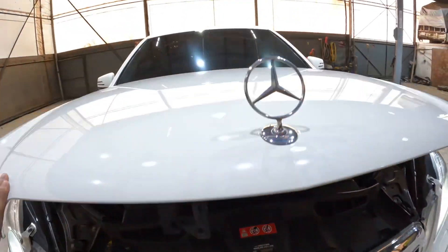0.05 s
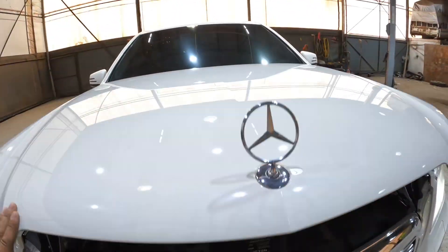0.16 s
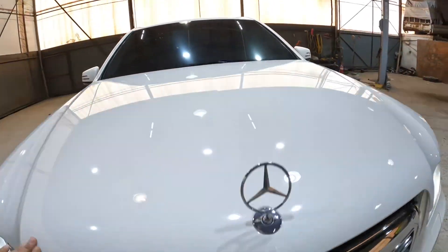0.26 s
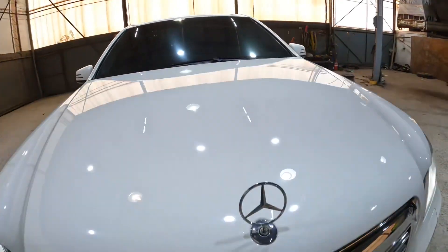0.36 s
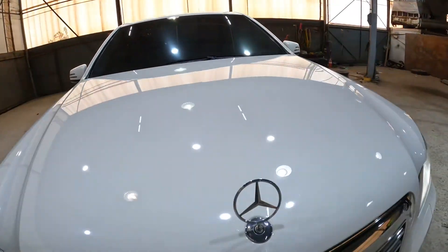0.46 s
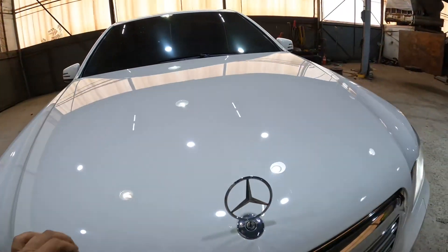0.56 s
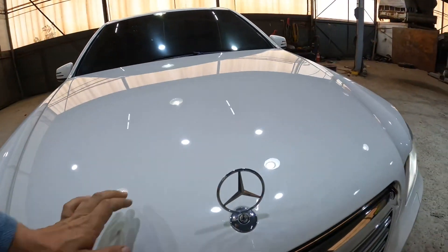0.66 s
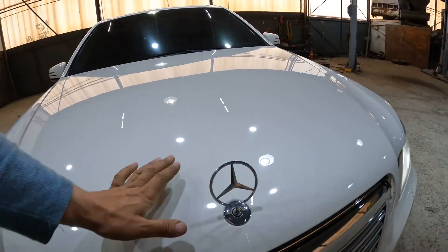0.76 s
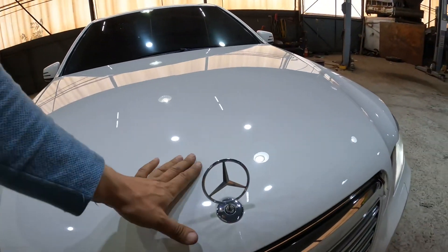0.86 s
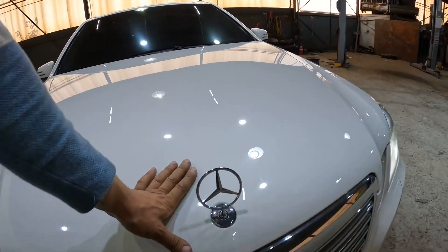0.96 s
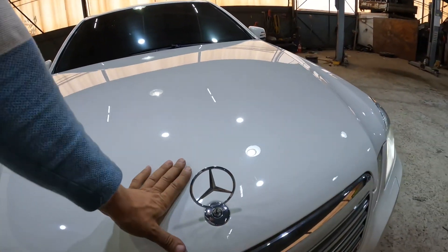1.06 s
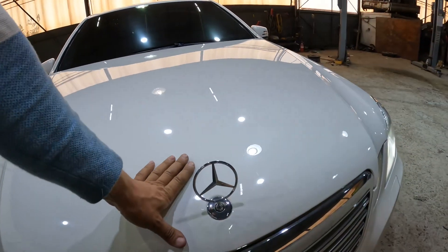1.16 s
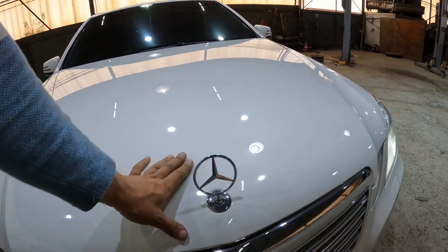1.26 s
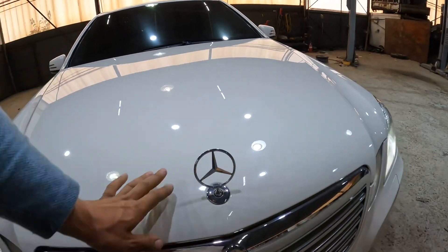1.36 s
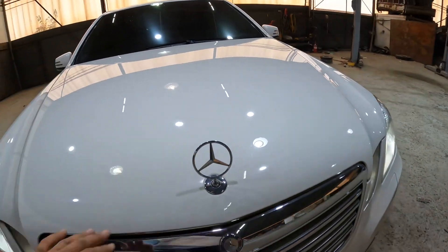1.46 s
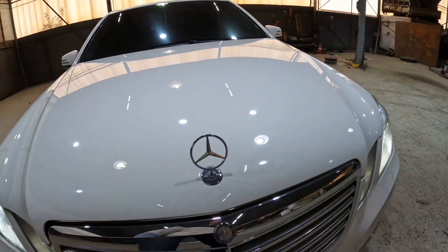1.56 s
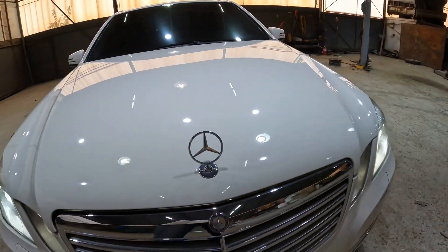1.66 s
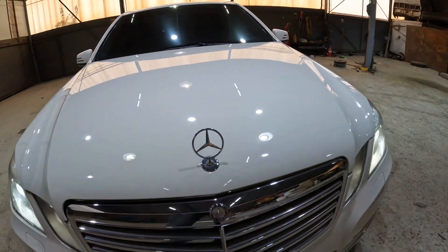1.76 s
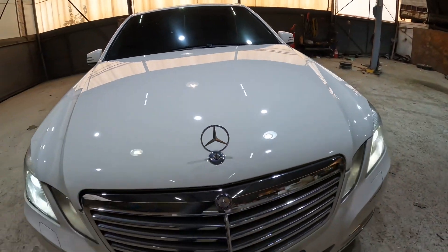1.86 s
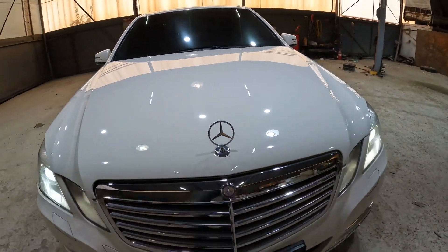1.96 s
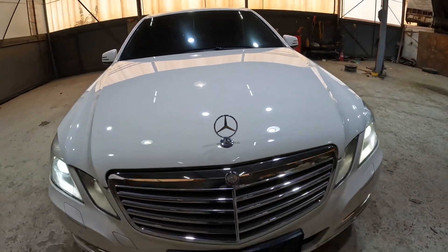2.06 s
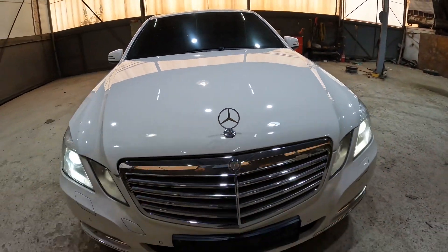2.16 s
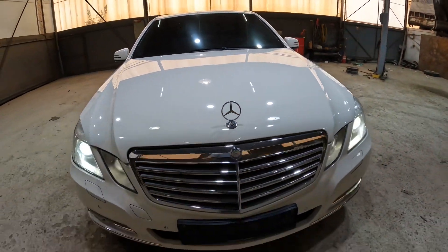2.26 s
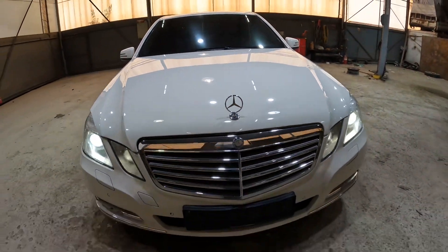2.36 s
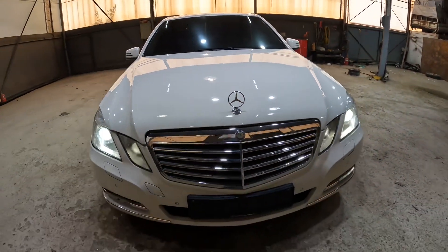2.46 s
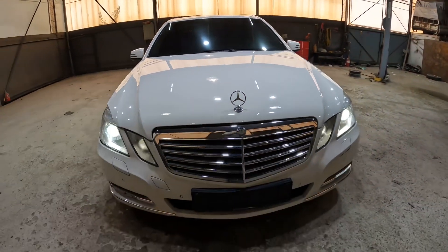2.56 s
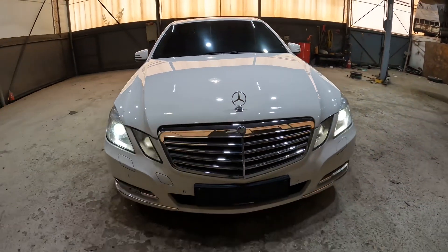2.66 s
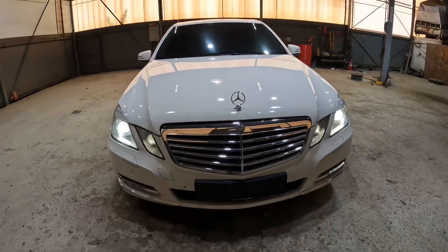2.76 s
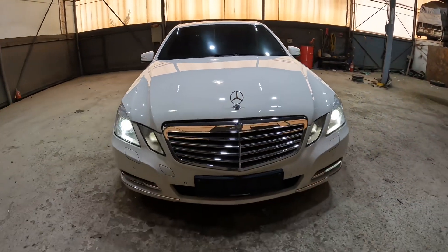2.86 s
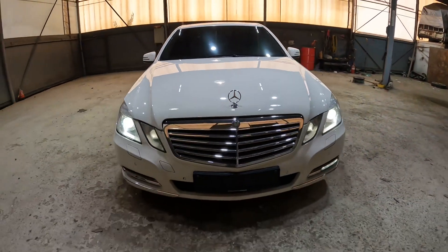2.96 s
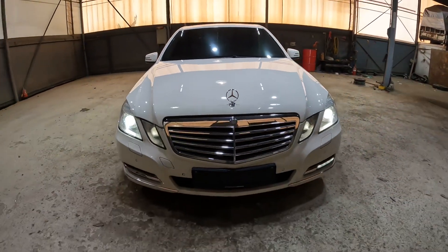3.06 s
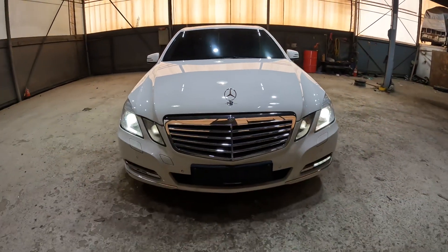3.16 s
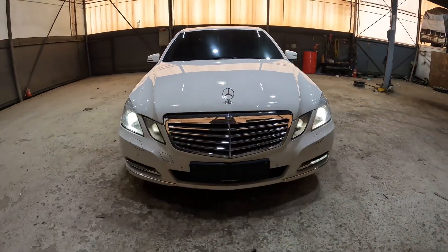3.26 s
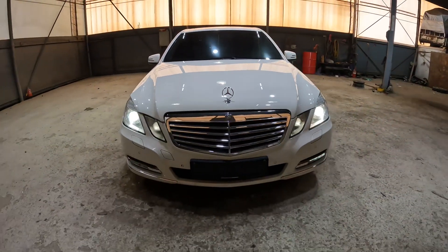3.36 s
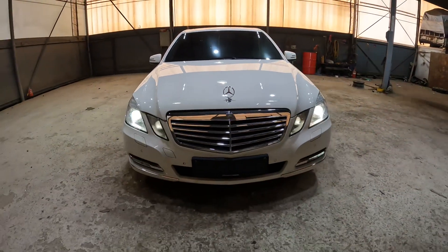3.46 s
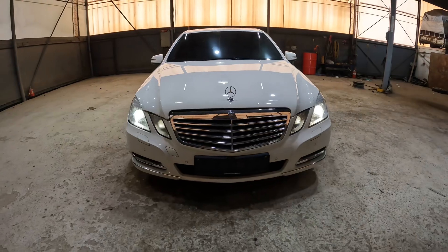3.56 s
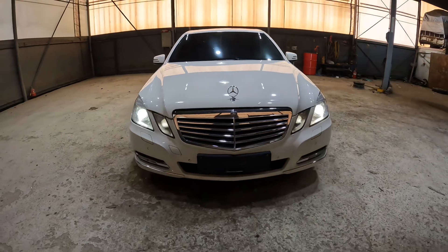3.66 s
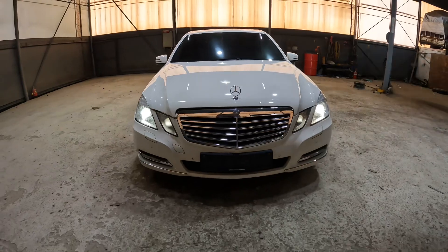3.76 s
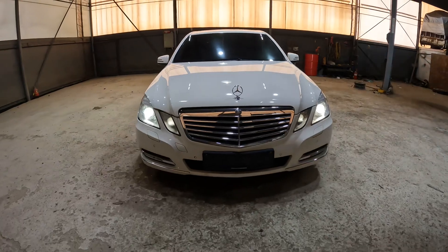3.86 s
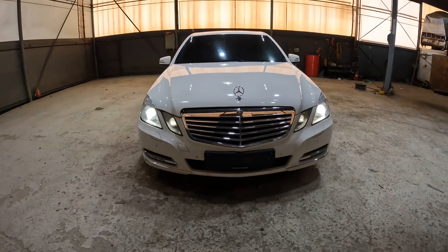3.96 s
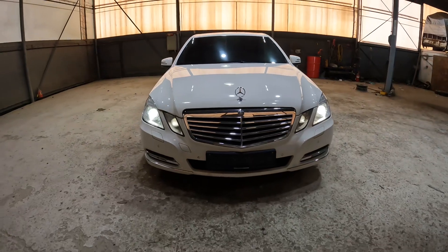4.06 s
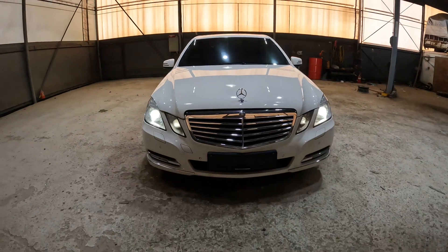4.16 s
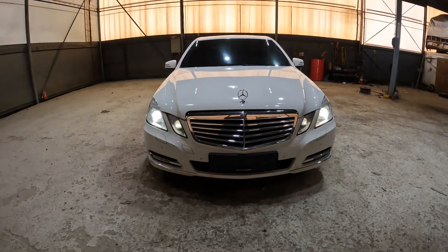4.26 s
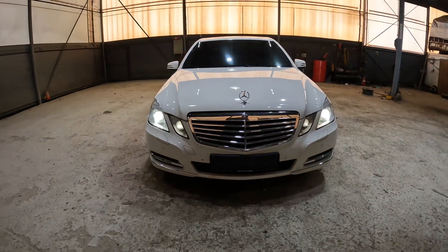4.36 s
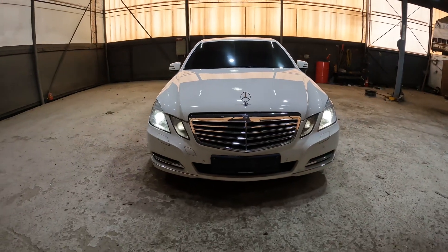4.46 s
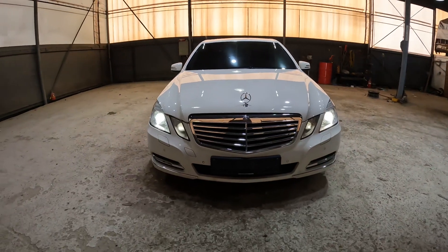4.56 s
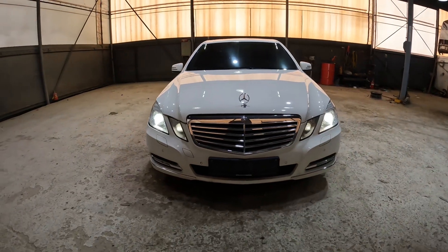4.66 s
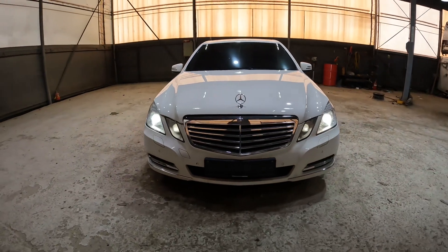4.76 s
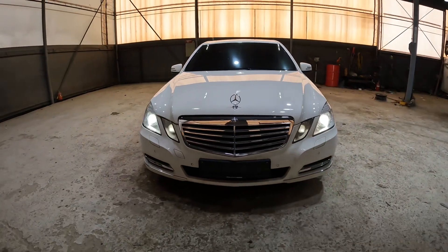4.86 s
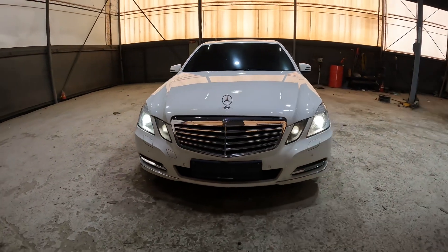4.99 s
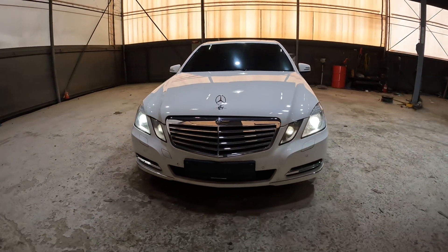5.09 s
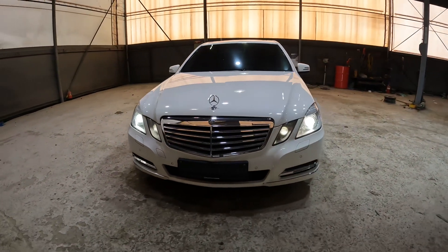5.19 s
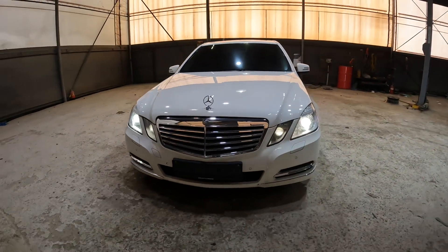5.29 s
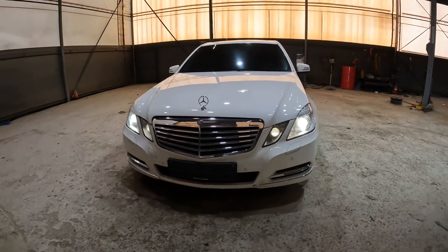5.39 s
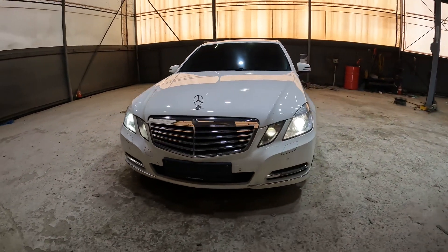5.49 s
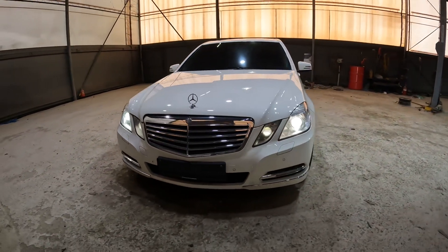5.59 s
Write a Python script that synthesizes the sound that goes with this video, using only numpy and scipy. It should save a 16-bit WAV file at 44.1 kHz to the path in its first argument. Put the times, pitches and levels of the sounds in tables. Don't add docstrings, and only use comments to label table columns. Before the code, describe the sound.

A car hood bangs down, bounces and is pressed shut over a steadily idling engine in a large echoing shed, then soles squeak and scuff.

```python
import sys
import numpy as np
from scipy import signal
from scipy.fft import rfft, irfft, next_fast_len
from scipy.io import wavfile

SR = 44100
rng = np.random.default_rng(int(sys.argv[2]) if len(sys.argv) > 2 else 0)


def field_ratio(decibels):
    return 10 ** (np.asarray(decibels, dtype=float) / 20)


def file_out(sig):
    cols = np.atleast_2d(sig).T
    lim = np.clip(cols, -1, 1)
    pcm = np.round(lim * 32767).astype(np.int16)
    wavfile.write(sys.argv[1], SR, pcm)


N = 248283


def rms_one(x):
    return x / np.sqrt(np.mean(x ** 2) + 1e-20)


def in_time(rows, outside=None):
    s, *columns = np.transpose(rows)
    return [np.interp(np.arange(N) / SR, s, c, outside, outside) for c in columns]


def at_hz(points, hz):
    curve_hz, curve_db = np.transpose(points)
    return np.interp(np.log(hz), np.log(curve_hz), curve_db)


def drift(rate):
    r = np.exp(-80 * np.pi * rate / SR)
    slow = signal.lfilter([1], [1, -2 * r, r * r], rng.standard_normal(N // 40 + 2002))[2000:]
    return np.interp(np.arange(N) / 40, np.arange(len(slow)), rms_one(slow))


def bumps(rows, half_s):
    t = np.arange(N) / SR
    return sum(db * np.maximum(1 - np.abs(t - s) / half_s, 0) for s, db in rows)


def held(times_s, db):
    return field_ratio(db + np.interp(np.arange(N) / SR, times_s, [-20, 0, 0, -20], -90, -90))


def dying(start_s, t60, rise_s, at=slice(0, N)):
    t = np.maximum(np.arange(at.start, at.stop) / SR - start_s, 0)
    return (1 - np.exp(-t / rise_s)) * np.exp(-np.log(1000) * t / t60)


def while_ringing(start_s, t60):
    return slice(int(start_s * SR), min(int((start_s + 1.5 * t60) * SR), N))


def ring(clicks, hz, t60):
    r, w = field_ratio(-60 / (t60 * SR)), 2 * np.pi * hz / SR
    return signal.lfilter([0, np.sin(w)], [1, -2 * r * np.cos(w), r * r], clicks + 1e-18)


def rough_tone(hz, start_s, jitter, at):
    t = np.arange(at.start, at.stop) / SR - start_s
    return np.sin(2 * np.pi * hz * t + jitter)


def band(x, low_hz, high_hz, order=2):
    sos = signal.butter(order, [low_hz, high_hz], "band", fs=SR, output="sos")
    return rms_one(signal.sosfilt(sos, x))


def spread(db):
    return field_ratio(np.array([[db / 2], [-db / 2]]))


def coloured(spectrum, unlike_share=1):
    # (frequency [Hz], likeness [0-1])
    likeness = [(30, 0.93), (100, 1), (200, 0.99), (380, 0.91), (690, 0.87), (1280, 0.84), (2360, 0.57),
                (3500, 1), (5000, 0.56), (8500, 1), (14800, 0.42)]
    size = next_fast_len(N)
    hz = np.maximum(np.fft.rfftfreq(size, 1 / SR), 1)
    mid, side = rfft(rng.standard_normal((2, size)))
    alike = np.clip(1 - unlike_share * (1 - at_hz(likeness, hz)), 0, 1)
    pair = np.sqrt(1 + alike) * mid + np.sqrt(1 - alike) * side * [[1], [-1]]
    return rms_one(irfft(pair * field_ratio(at_hz(spectrum, hz)), size)[:, :N])


def engine():
    # (time [s], level [dB])
    idle = [(0, -34.5), (.19, -36.5), (.41, -37.5), (.83, -47), (1.03, -44), (1.39, -48), (1.65, -45.5),
            (2.24, -41), (2.63, -38), (2.85, -37), (3.73, -36), (3.87, -37.5), (5.63, -37)]
    # (frequency [Hz], level [dB per Hz])
    rumble_colour = [(8.8, -30), (15, 2), (43, -8), (63, -8), (90, -18.5), (120, -19), (200, -120)]
    exhaust_colour = [(50, -25), (85, 1.5), (139, -2.5), (215, -5), (252, -7.5), (311, -10.5), (370, -11),
                      (450, -9.5), (580, -20), (990, -120)]
    roar_colour = [(250, -55), (430, -7), (518, 0), (814, -5), (934, 0.5), (1270, -1.5), (1770, -4.5),
                   (2130, -6.5), (2450, -10), (2750, -8), (3160, -12), (4500, -14), (5850, -24.5),
                   (9900, -120)]
    hiss_colour = [(2350, 0.5), (4000, -4.5), (4580, -5.5), (5570, -3), (7450, -3.5), (8000, -9.5),
                   (8520, -15), (10600, -11), (11400, -18.5), (12200, -17), (13200, -29.5), (14500, -13),
                   (15200, -57)]
    # (multiple of firing rate [1], level over the exhaust [dB])
    firing_orders = [(1, 0.5), (1.5, -0.5), (3, -3), (4, -14.5), (5, -8.5), (6, -11), (10, -17)]
    # (frequency [Hz], width [Hz], level over the roar [dB])
    whines = [(1016, 21, -21), (1135, 18, -18.5), (1444, 19, -13.5), (1765, 170, -14), (2020, 32, -20),
              (2670, 47, -36), (3910, 50, -24.5), (4500, 80, -23), (4840, 160, -20.5), (7470, 58, -27.5),
              (7700, 80, -30.5)]
    # (time [s], level [dB])
    body_shudders = [
        (.46, 1.4),
        (1.09, -4.5),
    ]
    # (time [s], depth [dB])
    lulls = [(0.0, 9), (.58, 12), (.85, 3), (1.2, 14), (3.5, 3.5), (4.12, 3), (4.78, 6), (5.6, -2)]
    # (time [s], change [dB])
    surges = [(.25, -1), (.93, -5), (1.45, -4), (3.0, 1), (4.13, 2), (4.4, 4.5), (4.75, -1)]
    # (level when settled [dB], share of the idle's swing [1], gain with hood up [dB], level
    # of the body's shudder [dB])
    rumble_law = (-28, 2.26, -4.5, -42)
    exhaust_law = (-38.5, 0.38, 6, -25.5)
    roar_law = (-36.5, 1.0, 0.7, -29.5)
    hiss_law = (-45.5, 1.05, 6.5, -42.5)
    belt_law = (-52.5, 1.3, 9, -49)
    firing_hz, settled_db = 36.59, -37
    hood_falls_s, hood_down_s = 0.11, 0.75
    belt_grips_s, belt_fade_db_per_s = 2.8, 70

    t = np.arange(N) / SR
    swing_db = in_time(idle)[0] - settled_db
    hood_up = np.interp(t, [hood_falls_s, hood_down_s], [1, 0])
    shudder = sum(field_ratio(db) * dying(s, t60=1.25, rise_s=0.025) for s, db in body_shudders)

    def gain(law):
        db, share, up_db, shudder_db = law
        return field_ratio(db + share * swing_db + up_db * hood_up) + field_ratio(shudder_db + 0.5 * swing_db) * shudder

    rumble = coloured(rumble_colour) * field_ratio(2.14 * drift(7.4) - bumps(lulls, half_s=0.164))

    turn = 2 * np.pi * np.cumsum(firing_hz * (1 + 0.00774 * drift(1.38))) / SR
    exhaust = coloured(exhaust_colour) * field_ratio(1.8 * drift(6))
    for k, db in firing_orders:
        waver = field_ratio(db + 4.3 * np.tanh(drift(7.8)))
        exhaust += waver * np.sin(k * turn + rng.uniform(0, 2 * np.pi))
    exhaust *= field_ratio(bumps(surges, half_s=0.15))

    surge_db = 0.85 * drift(9.1)
    roar = coloured(roar_colour) * field_ratio(surge_db + 0.4 * np.sin(turn) + 0.5 * drift(41))
    grille_db = 1.2 + 0.67 * swing_db
    for hz, width, db in whines:
        whine = rms_one(ring(rng.standard_normal(N), hz, t60=2.2 / width))
        roar += field_ratio(db + grille_db + 2.14 * drift(4.1)) * whine * spread(rng.normal(0, 3.1))
    hiss = coloured(hiss_colour) * field_ratio(surge_db + 1.24 * drift(41))

    slip = rng.standard_normal(N)
    whistle = ring(slip, 5130, t60=0.03) * field_ratio(4 * drift(11))
    whistle += ring(slip, 5300, t60=0.03) * field_ratio(4 * drift(11))
    chirp = rms_one(whistle) * field_ratio(-belt_fade_db_per_s * np.maximum(t - belt_grips_s, 0))

    out = gain(rumble_law) * rumble + gain(exhaust_law) * exhaust
    return out + gain(roar_law) * roar + gain(hiss_law) * hiss + gain(belt_law) * chirp


def catch():
    # (time [s], crack [dB], knock [dB], ring pitch [Hz], ring level [dB])
    contacts = [(0.3623, -4, -24, 3270, -8.5), (.365, -28, -27, 5380, -12), (0.378, -23, -11, 2040, -19),
                (0.388, -7, -22, 2040, -23), (0.393, -10, -13, 5180, -16), (0.404, -16, -21, 3670, -19),
                (0.412, -19, -13, 2830, -19), (0.417, -21, -26, 10000, -25), (0.424, -14, -25, 5300, -31),
                (.448, -15, -19.5, 4210, -21.5), (0.5078, -18.5, -11, 6100, -23),
                (.535, -42, -37, 3080, -28), (.566, -31, -17.5, 3100, -32), (0.599, -30, -36, 2470, -31),
                (0.929, -42, -34.5, 1520, -34), (1.048, -37, -27, 2050, -36),
                (1.056, -15.5, -35, 6400, -20), (1.059, -17, -28, 2830, -15),
                (1.0602, -28, -22, 10300, -22.5), (1.069, -21, -15, 1660, -11.5),
                (1.070, -27, -22, 4980, -18), (1.082, -21, -14, 3330, -29), (1.104, -37, -23, 1630, -27),
                (1.217, -33, -29, 1510, -27)]
    # (frequency [Hz], level [dB per Hz])
    crack_colour = [(350, 5), (600, -15), (766, -3), (1530, -5.5), (2060, -2), (2620, -4), (3490, -5),
                    (4330, -10.5), (5380, -8.5), (8180, -18), (10300, -27), (14300, -31), (15200, -45)]
    grit = rng.standard_normal(N) ** 3
    crack = coloured(crack_colour, unlike_share=0.57) * field_ratio(1.55 * drift(260))
    knock = band(grit, 120, 860)
    jitter = 1.2 * drift(200)
    out = np.zeros((2, N))
    for s, crack_db, knock_db, hz, ring_db in contacts:
        t60 = 0.046 - 0.0002 * crack_db
        at = while_ringing(s, 1.33 * t60)
        bright = field_ratio(crack_db) * crack[:, at] + field_ratio(ring_db) * rough_tone(hz, s, jitter[at], at)
        out[:, at] += bright * dying(s, t60, 0.0013, at)
        out[:, at] += field_ratio(knock_db) * dying(s, 1.51 * t60, 0.0037, at) * knock[at]

    badge_hz, badge_t60_s = 10300, 0.81
    buzz = rms_one(ring(grit, badge_hz, t60=0.004)) * field_ratio(3 * drift(60))
    shaken = field_ratio(-59) * dying(0.32, badge_t60_s, rise_s=0.004)
    shaken += field_ratio(-53) * dying(1.058, badge_t60_s, rise_s=0.002)
    return out + buzz * shaken * spread(3)


def panel():
    # (time [s], pitch [Hz], level [dB], swell [s], t60 [s])
    drop_modes = [(.364, 199.6, -9.5, 0.0071, 0.31), (.385, 123, -2.5, 0.015, 0.17),
                  (.39, 350, -8.5, 0.01, .2), (.395, 260, -15, .006, .15), (.421, 82.6, -1.5, 0.0068, 0.15),
                  (.41, 35, -17, .015, 0.12), (.507, 198, -15, .01, 0.22), (.562, 184.7, -16, .01, 0.23),
                  (.55, 45, -17, .02, 0.26), (.61, 40, -16.5, .03, 0.34), (.60, 112, -24, 0.0087, .2),
                  (.81, 179.4, -30.5, 0.023, .3)]
    # (time [s], pitch [Hz], level [dB], swell [s], t60 [s])
    press_modes = [(1.057, 71, -4.5, .012, 0.29), (1.058, 128.1, -11.5, 0.0039, 0.38),
                   (1.064, 172, -19, 0.0065, .18), (1.062, 270, -14.5, .006, 0.18),
                   (1.06, 374, -15, 0.0066, .17), (1.062, 705, -25, 0.0057, .12),
                   (1.12, 250.4, -24.5, 0.011, 0.22), (1.13, 55, -23, .02, 0.22),
                   (1.215, 150, -28, .005, 0.11), (1.245, 330, -26, 0.0031, 0.13)]
    modes = list(drop_modes) + list(press_modes)
    out = np.zeros((2, N))
    lags = rng.normal(0, 0.036, (len(modes), 1))
    wobble = field_ratio(1.5 * drift(30))
    for (s, hz, db, swell, t60), lag in zip(modes, lags):
        at = while_ringing(s, t60)
        since = np.maximum(np.arange(at.start, at.stop) / SR - s, 0)
        sag_s = 0.0014 * (1 - np.exp(-since / 0.026))
        phase = 2 * np.pi * hz * (since + sag_s)
        out[:, at] += field_ratio(db) * dying(s, t60, swell, at) * np.sin(phase + lag * [[1], [-1]])
    return out * wobble


def shed():
    # (frequency [Hz], level [dB per Hz])
    boom = [(35, -45), (60, -20), (188, -6), (370, 8.5), (450, -1.5), (601, -6.5), (738, 6), (1500, -41),
            (6020, -22), (14000, -60)]
    # (frequency [Hz], t60 [s])
    boom_decay = [(60, 0.57), (400, 1.0), (2000, 0.92), (6000, 0.82), (12000, 0.56)]
    # (time [s], level [dB])
    slams = [
        (.40, -12.5),
        (.52, -30),
        (1.07, -22.5),
    ]
    at = slice(0, 3 * SR)
    noise = coloured(boom, unlike_share=2.4)[:, at]
    out = np.zeros((2, N))
    edges = 45 * 2. ** np.arange(9.4)
    for low, high in zip(edges, np.minimum(edges[1:], 19000)):
        sos = signal.butter(2, [low, high], "band", fs=SR, output="sos")
        t60 = at_hz(boom_decay, np.sqrt(low * high))
        envelope = sum(field_ratio(db) * dying(s, t60, 0.0032, at) for s, db in slams)
        out[:, at] += signal.sosfilt(sos, noise) * envelope
    return out * field_ratio(1.4 * drift(27))


def squeaks():
    # (time [s], level [dB], pitch [Hz], overtone level [dB], t60 [s])
    chirps = [(1.218, -26.5, 3120, -37, .035), (1.245, -26.5, 3200, -34, 0.038),
              (2.237, -38, 5140, -40, .055), (2.662, -38, 5280, -40, .05), (2.696, -32, 4700, -25, .065),
              (2.72, -38, 4660, -18, .076), (2.75, -43, 10130, -40, .03), (2.85, -30, 4220, -7.5, .042),
              (2.968, -38, 4200, -8, .04), (3.068, -35.5, 4250, -22, .1), (3.284, -30.5, 4230, -17, 0.062)]
    # (time [s], level [dB], centre [Hz])
    ticks = [
        (1.057, -30, 10500),
        (1.068, -32, 10500),
        (2.695, -37, 7000),
        (2.851, -40, 10000),
        (2.968, -30, 3300),
        (3.222, -27, 3200),
    ]
    # swell starts, hold starts, hold ends, stop [s]
    squeal_times = (2.9, 3.08, 3.45, 3.55)
    slip = rng.standard_normal(N) * field_ratio(2.4 * drift(150))
    jitter = 0.5 * drift(130)
    out = np.zeros(N)
    for s, db, hz, over_db, t60 in chirps:
        at = while_ringing(s, t60)
        envelope = dying(s, t60, 0.00093, at)
        for k, part_db in [(1, 0), (1.97, over_db), (2.9, 1.6 * over_db)]:
            tone = rough_tone(min(k * hz, 15000), s, k * jitter[at], at)
            out[at] += field_ratio(db + part_db + 1) * envelope * tone
    out += held(squeal_times, db=-57) * rms_one(ring(slip, hz=4300, t60=0.037))
    for s, db, hz in ticks:
        at = while_ringing(s, 0.04)
        grit = band(slip[at], 0.29 * hz, 1.25 * hz, order=3)
        out[at] += field_ratio(db) * dying(s, 0.03, 0.00039, at) * grit
    return out


def scuff():
    # (time [s], level [dB], t60 [s])
    sole_grabs = [(3.549, -22, .06), (3.555, -18, 0.066), (3.572, -21, .06), (3.582, -16, 0.023),
                  (3.594, -27, 0.073)]
    # swell starts, hold starts, hold ends, stop [s]
    drag_times = (3.54, 3.56, 3.6, 3.63)
    grabs = sum(field_ratio(db) * dying(s, t60, rise_s=0.0037) for s, db, t60 in sole_grabs)
    grains = rng.standard_normal(N) * field_ratio(4.5 * drift(200))
    hollow = grabs * band(grains, 1590, 2210, order=3)
    return hollow + held(drag_times, db=-36.5) * band(grains, 2100, 5200, order=3)


def fan():
    # (time [s], pitch [Hz], level [dB])
    run_down = [
        (4.9, 385, -57),
        (5.1, 381, -50.5),
        (5.4, 368, -43),
        (5.63, 360, -52),
    ]
    hz, db = in_time(run_down)
    not_yet = np.arange(N) < run_down[0][0] * SR
    level = field_ratio(db + 2.0 * drift(9.2) - 60 * not_yet)
    return level * np.sin(2 * np.pi * np.cumsum(hz) / SR)


def scene():
    hood = catch() + panel() + shed()
    shoes = squeaks() * spread(3.5) + scuff() * spread(5.4)
    return engine() + hood + shoes + fan()


def ports(spectra, hz):
    # (frequency [Hz], left minus right [dB])
    leaning = [(60, 0.5), (120, -1.5), (240, 1), (470, 0.0), (940, 1), (1880, 1), (3730, 0.5), (7430, 1),
               (14800, 4.5)]
    # (frequency [Hz], left leads by [radians])
    lead = [(0, -0.018), (2150, -0.63), (2840, -0.57), (3620, -0.69), (4820, -0.16), (6200, 0.36),
            (7920, -1.36), (9040, -0.58), (14700, 0.0), (15000, 0.3)]
    half = np.array([[.5], [-.5]])
    lead_radians = np.interp(hz, *np.transpose(lead))
    return spectra * field_ratio(at_hz(leaning, hz) * half) * np.exp(1j * lead_radians * half)


def roll_off(x):
    return signal.sosfilt(signal.butter(12, 15400, fs=SR, output="sos"), x)


def record(dry):
    size = next_fast_len(N)
    hz = np.maximum(np.fft.rfftfreq(size, 1 / SR), 1)
    heard = irfft(ports(rfft(dry, size), hz), size)[:, :N]
    rounded = 1.133 * np.tanh(heard / 1.252)
    low_pass = signal.cheby2(10, 60, 15600, fs=SR, output="sos")
    mix = signal.sosfilt(low_pass, rounded)
    return roll_off(mix)


dry = scene()
out = record(dry)
file_out(out)
```